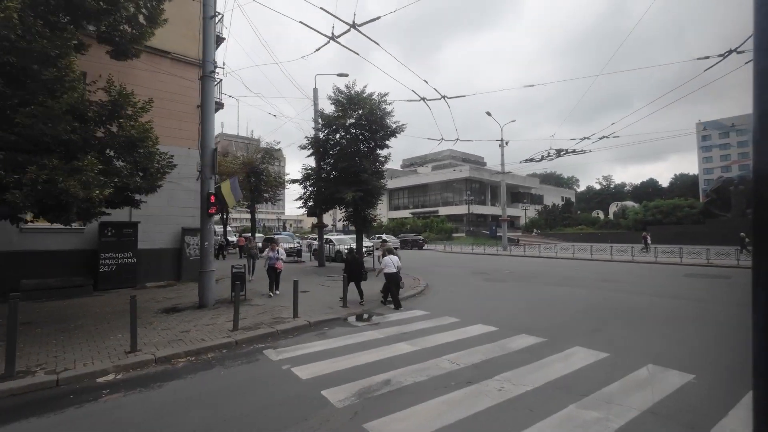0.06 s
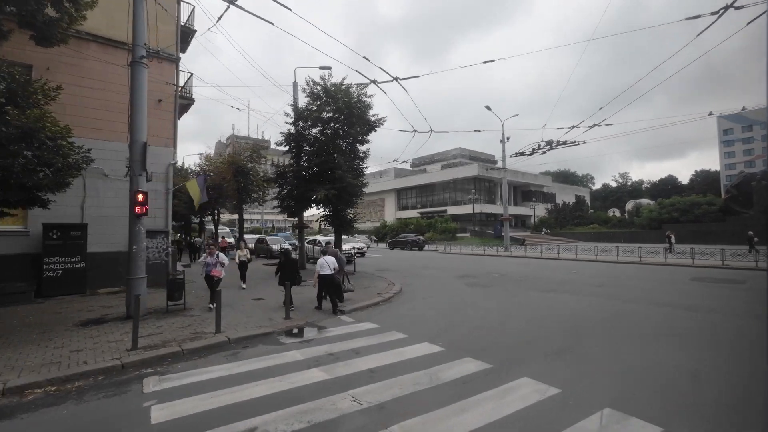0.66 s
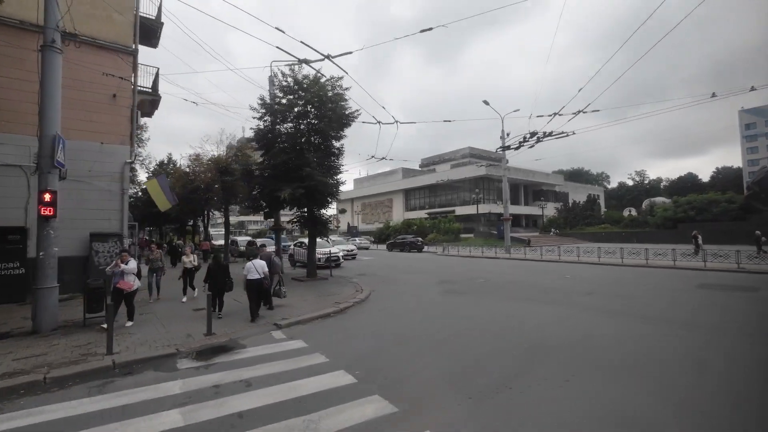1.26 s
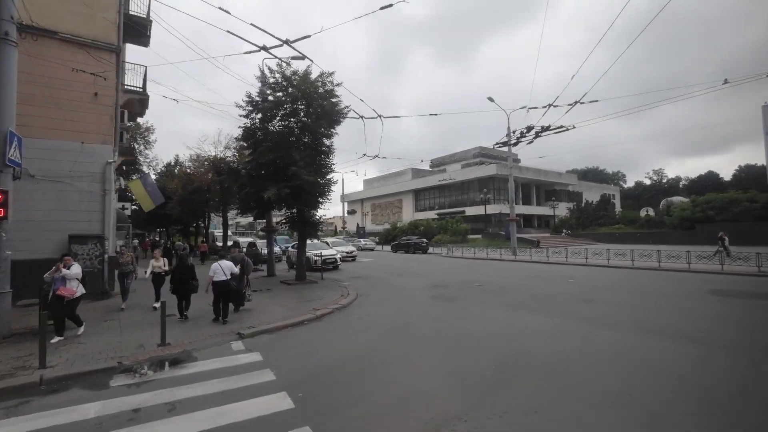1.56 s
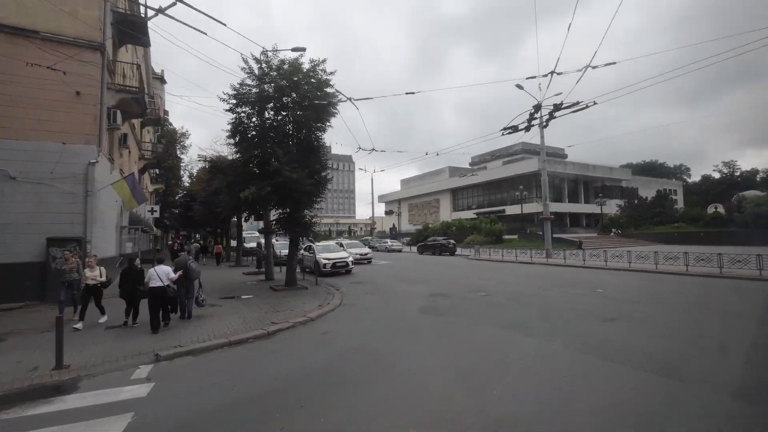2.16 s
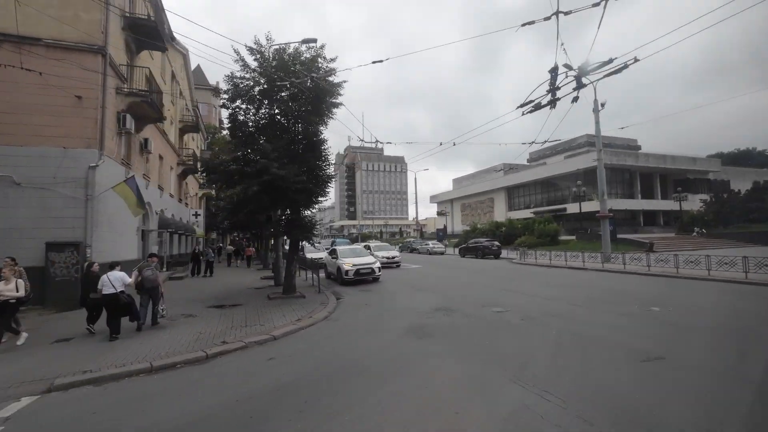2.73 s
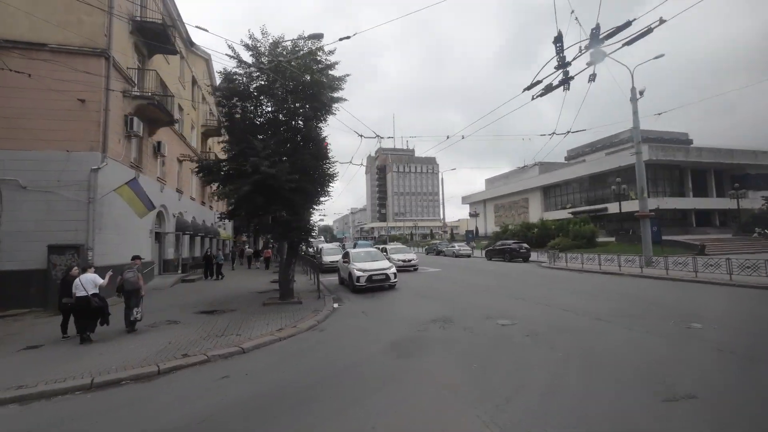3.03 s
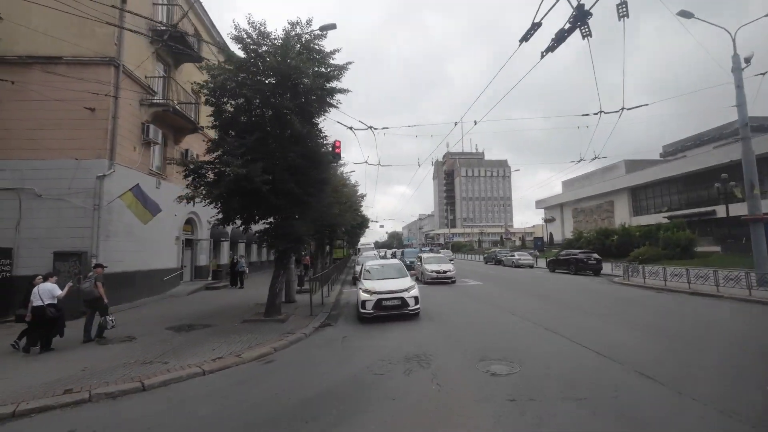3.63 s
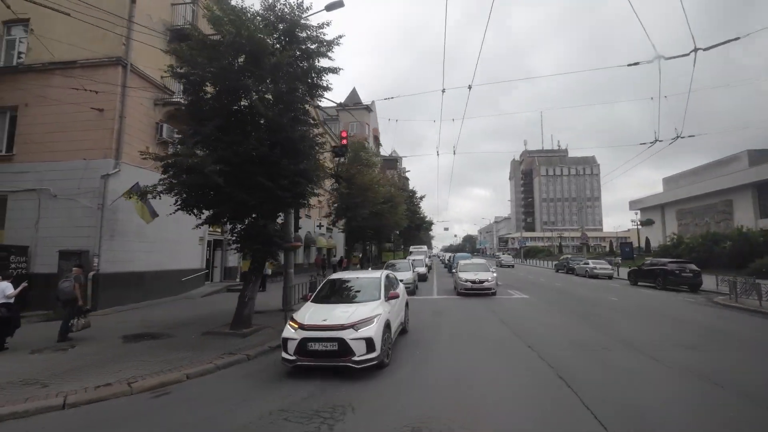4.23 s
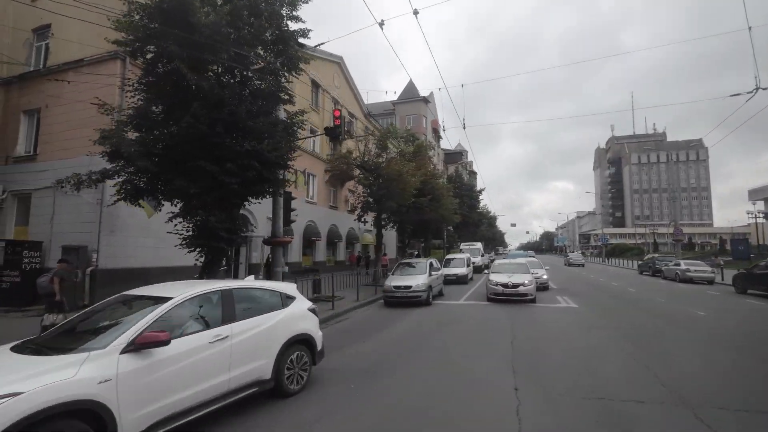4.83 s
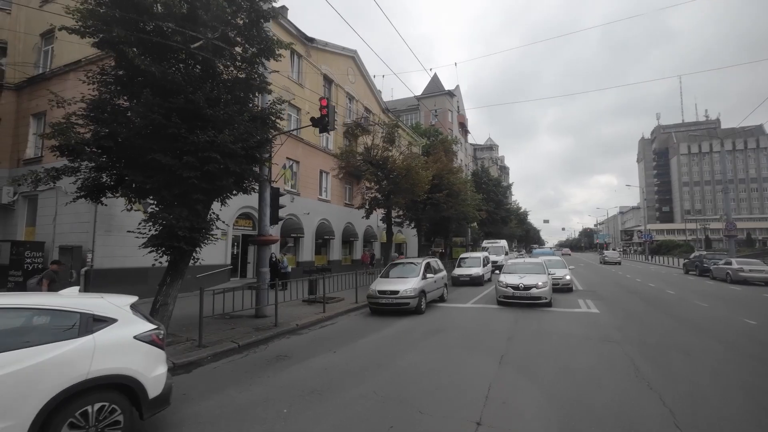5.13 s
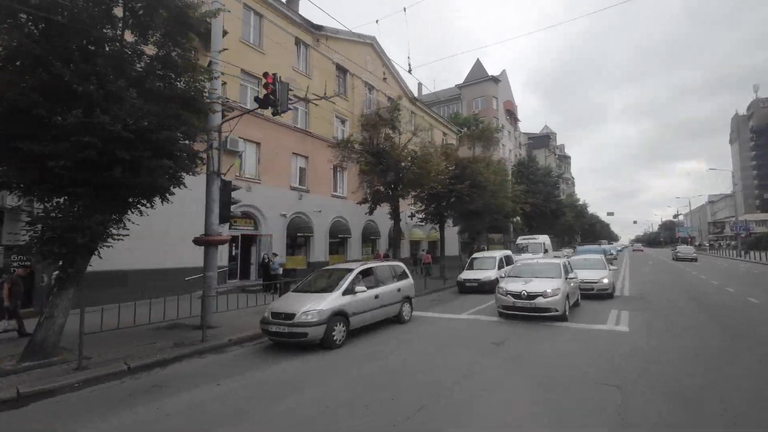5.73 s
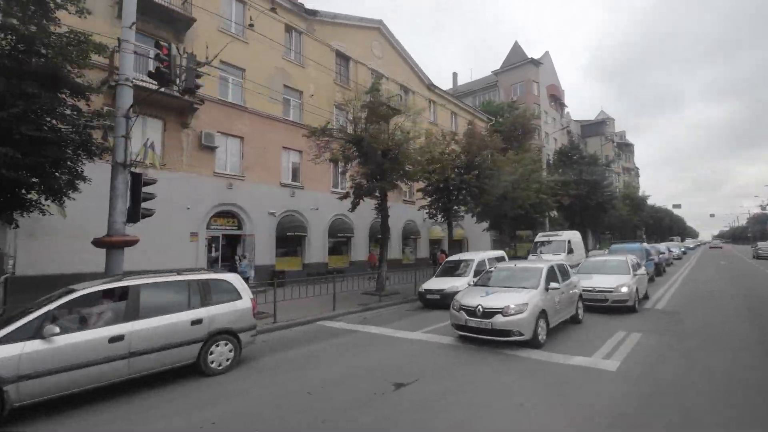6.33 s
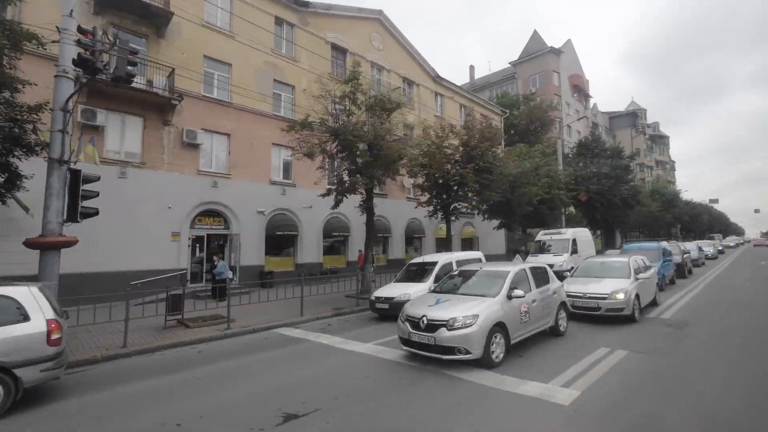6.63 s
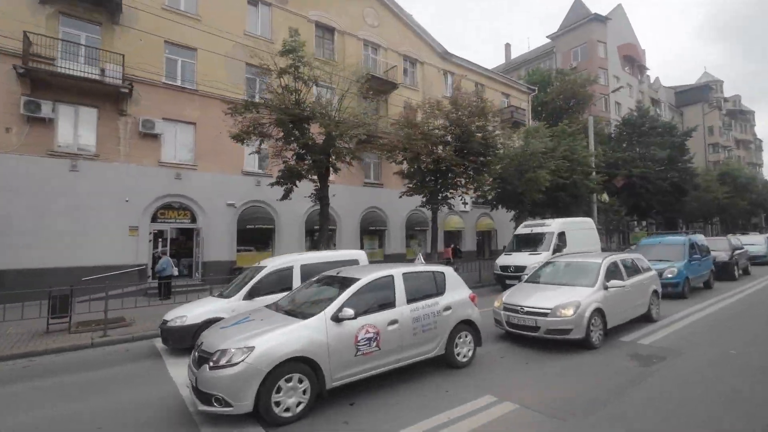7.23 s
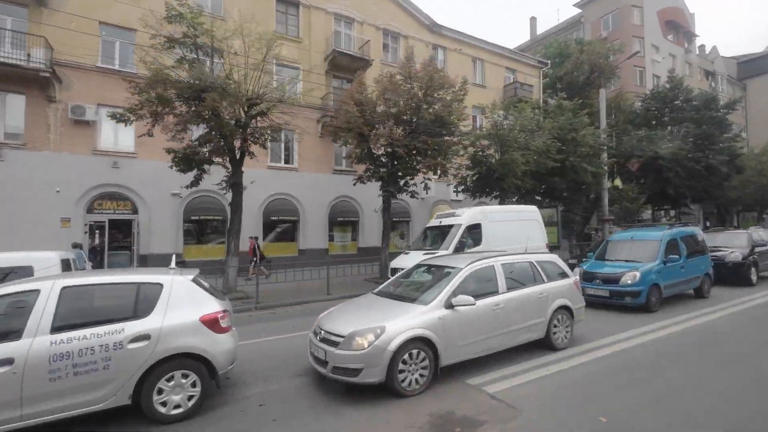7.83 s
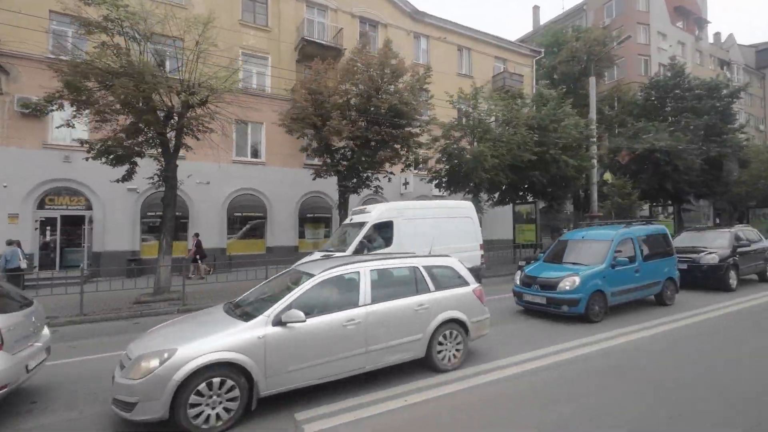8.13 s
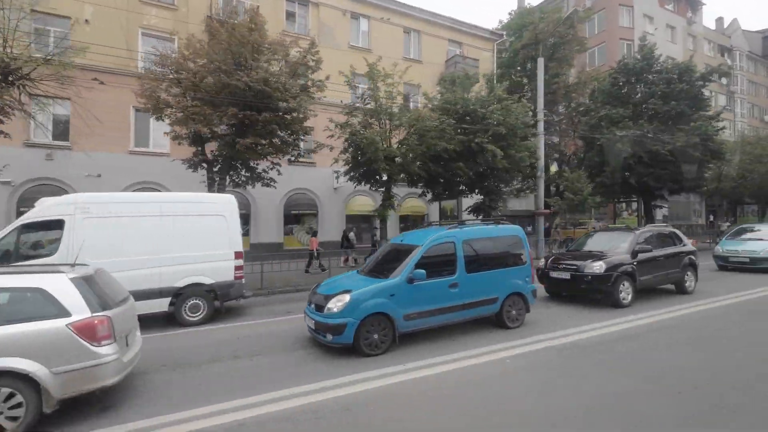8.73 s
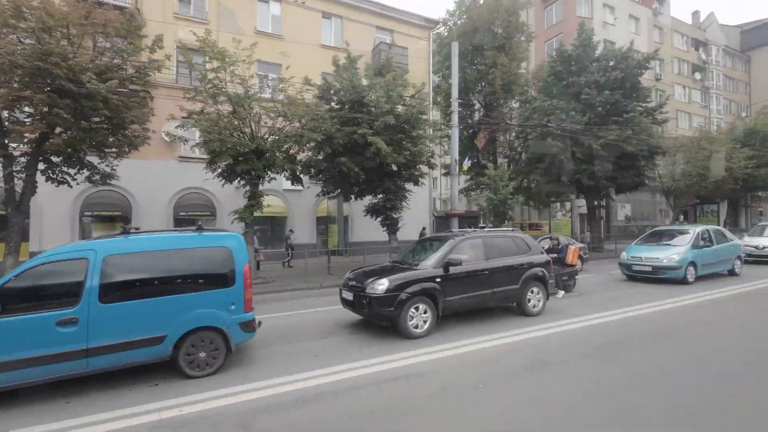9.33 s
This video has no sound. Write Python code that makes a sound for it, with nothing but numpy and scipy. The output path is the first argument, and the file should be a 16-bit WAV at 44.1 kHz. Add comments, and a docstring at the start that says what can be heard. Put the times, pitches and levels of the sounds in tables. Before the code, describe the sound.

Heard from a front seat inside a diesel city bus, the engine booms and clatters with a regular knock as the bus pulls away with a brief groan. Its pitch climbs, falls during a gear change midway, then climbs again more slowly. A thin gear whine and a faint turbo rush run under the load. The body rumbles over road bumps, compressed air puffs softly and spits once, and loose fittings click now and then.

```python
"""Inside a diesel city bus turning through a junction: it pulls away, changes gear and pulls again.
The six-cylinder engine booms in the cabin's air modes and clatters through the panels, knocking once
a cycle; the turbo rushes under load. Meshing gears whine, the body rumbles over the road,
compressed air puffs from valves at the gear changes and loose fittings click."""
import sys
import numpy as np
from scipy.fft import rfft, irfft, next_fast_len
from scipy.io import wavfile
from scipy.ndimage import uniform_filter1d, map_coordinates

SR = 44100
rng = np.random.default_rng(int(sys.argv[2]) if len(sys.argv) > 2 else 0)


def to_wav(s):
    """Save 16-bit WAV."""
    ch = np.atleast_2d(s).T  # columns
    pcm = np.round(np.clip(ch, -1, 1) * 32767)  # PCM
    wavfile.write(sys.argv[1], SR, pcm.astype(np.int16))


N = 413216

PEDAL_S, RELEASE_S, SPOOL_S = 0.08, 0.085, 0.5  # time constants: load rise, load fall, turbo spin-up
CRUISE_CYCLE_HZ, CRUISE_MESH_HZ = 10, 240
# pedal presses: down/s, up/s, depth/0-1, turbo rush/dB
PULLS = [(-1.5, 0.82, 0.35, -85), (.76, 4.075, 0.99, -60.5), (4.8, 9.4, .99, -66)]
# panel modes, in phase at both ears: f/Hz, width/Hz, lift/dB
PANEL_MODES = [(388, 37, 3.5), (728.4, 70, 8.5), (1095, 100, -3), (1410, 67, 5.5), (1542, 97, 5),
               (1614, 42, 10.5), (1746, 80, 7), (2040, 53, 2), (2614, 27, 6.5), (3080, 73, 4),
               (3283, 27, 8), (3430, 31, 5)]
# cabin air modes: f/Hz, width/Hz, lift/dB
AIR_MODES = [(48.7, 5.2, 3), (57.3, 3, -5.5), (65.13, 7.3, 9.5), (69.5, 2.3, -6), (78.5, 5.5, 8),
             (87.3, 7.4, -8), (111.6, 5.8, 8), (121.2, 14, -3), (137, 5.7, 7.5), (154, 4, 5),
             (169.8, 12.2, 8.5), (197, 66, -7), (224.7, 16, 4.5), (261.7, 15, 12), (327, 19, 1)]
# mid-range roar; every law lists: cruise level/dB, gain per speed doubling/dB, off-pedal loss/dB
ROAR_LAW = (-31.5, 6.4, 5.5)


def exhaust(cycle, pace, load, boost):
    """Six firings a cycle boom in the air modes; weaker, rough orders swell in the panels."""
    # low orders: multiple of cycle rate, cruise level/dB, per doubling/dB, off-pedal loss/dB
    orders = [(6, -27, 0, 14), (9, -41, 4, 2), (12, -30, -8, 1), (14, -35.5, 0, 18), (15, -42.5, 6, 12.5),
              (18, -34, -17, 14)]
    low = sum(tone(k * cycle, level(law, pace, boost), flutter_db=0.96, drift_rad=0.011 * k)
              for k, *law in orders)
    rough_db = level(ROAR_LAW, pace, load) - 7
    # uneven firing times blur the higher orders most
    rough = sum(tone(k * (cycle + 0.0037 * wobble(50)), rough_db - 0.34 * k, flutter_db=5, drift_rad=0.41)
                for k in range(21, 37, 3))
    firing = fuel(PEDAL_S)
    return resonate(low * firing, AIR_MODES) + resonate(rough * firing, PANEL_MODES)


def clatter(cycle, pace, load):
    """Each firing rattles and growls; once a cycle a hard knock rings the cover, then a tick follows."""
    # spectra: f/Hz, level/dB
    rattle_spectrum = [(450, -42), (800, -14.5), (1100, -1), (1350, 2.5), (1700, -6.5), (2100, -2),
                       (2750, -10.5), (3400, -15.5), (4400, -18), (5200, -28.5), (6200, -37), (7500, -50),
                       (11000, -41), (15000, -69)]
    growl_spectrum = [(380, -11), (460, 4), (540, -0.5), (620, -5.5), (740, 1.5), (900, -0.5), (1050, -5.5),
                      (1300, -23), (3000, -73)]
    knock_spectrum = [(700, -47), (1200, -13), (1400, 2), (1650, -7), (1900, -9.5), (2600, -32),
                      (5000, -60), (9000, -94.5)]
    tick_spectrum = [(1500, 0.5), (2600, -8), (3050, 3), (3400, 1), (3800, -12), (4600, -30), (5150, -12),
                     (5800, -17.5), (8000, -31), (12000, -82)]
    # laws, knock relative to clatter: cruise/dB, per doubling/dB, off-pedal loss/dB
    clatter_law = (-36.5, 5.4, 6.1)
    knock_law = (2.3, -3, 4)
    tick_law = (-41.3, 7.5, 6.5)
    # hardest knock and growl: t/s, gain/dB
    knock_gains = [(.4, -2), (.85, 1), (2.4, 0), (2.9, -2), (4.0, -1.5), (4.95, 3), (5.2, 2), (5.6, -5),
                   (6.3, -6), (6.55, 0), (7.3, 1.5), (8.3, -.5), (9.37, -1.5)]
    growl_gains = [(0, -61), (.8, -48.5), (1.4, -40.5), (2.3, -41.5), (3.9, -38.5), (4.2, -53), (5.0, -50),
                   (7.0, -51.5), (7.3, -46), (8.5, -41), (9.37, -38.5)]
    cover_hz = 1430
    firing = 6 * cycle
    rattle_drive = (1 + .5 * stroke(firing, place=.92, width=.28)) * amp(wobble(60))
    rattle = amp(-3.5) * cabin(rattle_spectrum, rattle_drive)
    growl_drive = (1 + .37 * stroke(firing, place=.18, width=.24)) * amp(2.5 * wobble(9.1))
    growl = fuel(PEDAL_S) * amp(curve(growl_gains)) * cabin(growl_spectrum, growl_drive)
    hard = amp(curve(knock_gains)) * stroke(cycle, place=.935, width=.056)
    weak = .4 * stroke(cycle, .34, .06) + .25 * stroke(cycle, .15, .05) + .22 * stroke(cycle, .65, .05)
    ring = tone(cover_hz * seconds() + .17 * wobble(260), level_db=-3, flutter_db=1, drift_rad=1)
    knock = amp(level(knock_law, pace, load)) * (hard + weak) * even(ring + cabin(knock_spectrum))
    tick_pulses = stroke(cycle, place=.985, width=.055) + .25 * stroke(cycle, place=.25, width=.08)
    tick = amp(level(tick_law, pace, load)) * tick_pulses * even(cabin(tick_spectrum))
    return amp(level(clatter_law, pace, load)) * (rattle + knock) + tick + growl


def body(pace, road_pace, load, boost):
    """Bumps rock the body; rumble and roar grow with engine speed, hiss and swish with road speed."""
    # road bumps: t/s, level/dB
    bumps = [(.01, -23), (3.079, -19), (3.25, -20), (3.67, -27), (3.88, -20), (4.16, -19), (4.6, -18),
             (5.13, -16), (5.412, -14.5), (5.75, -16.5), (6.0, -19), (6.2, -17), (6.8, -16), (6.98, -15.5),
             (7.92, -21), (8.85, -18)]
    # spectra: f/Hz, level/dB
    shake_spectrum = [(8, -44), (18, 24), (26, 2.5), (34, 12.5), (45, -16), (60, -15), (90, -64),
                      (200, -87)]
    rumble_spectrum = [(35, -26), (55, 1.5), (75, 8.5), (92, 0.5), (110, 4), (128, -3.5), (165, 1.5),
                       (205, -6.5), (270, -14.5), (400, -41), (900, -84)]
    roar_spectrum = [(120, -58), (210, -4), (270, 0), (390, -0.5), (450, -7), (530, -7.5), (620, -10.5),
                     (760, -14.5), (880, -18), (1100, -21), (1600, -23), (4000, -60)]
    hiss_spectrum = [(2500, -37), (5000, 5), (8000, 1), (10500, -0.5), (13000, -0.5), (15000, -17.5)]
    swish_spectrum = [(900, -36), (1800, 10.5), (2600, -9.5), (3500, 3), (4400, -10), (5400, -4.5),
                      (8000, -16), (15000, -44)]
    # laws: cruise/dB, per doubling/dB, off-pedal loss/dB
    shake_law = (-23, 6.7, 0.26)
    rumble_law = (-24.5, 5.6, 1.6)
    hiss_law = (-66, 3.6, 7.5)
    swish_law = (-51, 9.6, 7.6)
    bending_hz, bump_rise_s = 30.1, 0.049
    bump_power = np.zeros(N)
    for start_s, db in bumps:
        age = since(start_s) / bump_rise_s
        bump_power += (amp(db) * age * np.exp(1 - age)) ** 2
    rocking = np.sqrt(amp(level(shake_law, road_pace, load)) ** 2 + bump_power)
    bending = tone(bending_hz * seconds(), level_db=-2, flutter_db=1.5, drift_rad=1.5)
    shake = rocking * (bending + cabin(shake_spectrum))
    rumble = amp(level(rumble_law, pace, load)) * cabin(rumble_spectrum)
    roar = amp(level(ROAR_LAW, pace, load) + 0.52 * wobble(13)) * cabin(roar_spectrum)
    hiss = amp(level(hiss_law, road_pace, boost) + 0.93 * wobble(27)) * cabin(hiss_spectrum)
    swish = amp(level(swish_law, road_pace, boost)) * cabin(swish_spectrum)
    return shake + rumble + roar + hiss + swish


def transmission(mesh_hz, boost):
    """Gear teeth whine under torque, swelling in the air modes and blurring into a drone at speed."""
    # laws: cruise/dB, per doubling/dB, off-pedal loss/dB
    whine_law = (-37.5, -1.2, 8.3)
    drone_law = (-45.5, 20, 7.5)
    # drone: f/Hz, level/dB
    spectrum = [(200, -31), (262, 8), (280, 0.5), (305, 12), (328, 7.5), (350, -11), (450, -44)]
    road_pace = mesh_hz / CRUISE_MESH_HZ
    whine_db = level(whine_law, road_pace, boost)
    whine = tone(np.cumsum(mesh_hz) / SR, whine_db, flutter_db=0.5, drift_rad=.4 * road_pace ** 6)
    drone = amp(level(drone_law, road_pace, boost)) * cabin(spectrum)
    return resonate(whine * fuel(rise_s=0.15), AIR_MODES) + drone


def pull_away():
    """The drive line groans and shudders as the bus gathers its first speed."""
    # groan: f/Hz, level/dB
    spectrum = [(260, -14), (330, 14.5), (400, -6.5), (490, -2), (640, -32), (790, -23), (870, 0.5),
                (1000, -34), (2000, -67)]
    groan = amp(-40.5) * cabin(spectrum, amp(1.2 * wobble(15)))
    shudder_hz = np.interp(seconds(), [0, .6, 1.4], [74.8, 72.8, 80.16])
    shudder = tone(np.cumsum(shudder_hz) / SR, level_db=-31, flutter_db=2, drift_rad=0.25)
    return press(down_s=-0.15, up_s=1.48, rise_s=PEDAL_S) * (groan + shudder)


def booms():
    """Now and then an air mode of the cabin swells briefly."""
    # swells: t/s, f/Hz, gain/dB, half length/s
    swells = [(1.46, 79, -19.5, 0.088), (2.2, 452, -41, .45), (2.512, 398.6, -32.5, 0.14),
              (3.17, 255, -29, 0.13), (3.2, 146, -21.5, 0.076), (3.7, 543, -40, .35),
              (3.972, 262.7, -29.5, 0.14), (4.702, 111.8, -26.5, 0.19), (5.03, 111, -28.5, 0.097)]
    t = seconds()
    return sum(amp(db) * np.exp(-((t - peak_s) / half_s) ** 2)
               * tone(hz * t, level_db=-2, flutter_db=2, drift_rad=0.23)
               for peak_s, hz, db, half_s in swells)


def overrun(pace):
    """With the fuel cut, unloaded gears rattle in their casing, fading as the engine slows."""
    # rattle: f/Hz, level/dB
    spectrum = [(450, 6), (700, -5), (900, -24), (1250, -3.5), (1800, -22), (3700, -16), (6000, -39)]
    # casing modes: f/Hz, width/Hz, lift/dB
    casing_modes = [(524, 60, 6.8), (670, 56, 15), (1240, 60, 7.6), (2480, 120, 3.2), (3630, 140, 5.1)]
    rattle = unit(resonate(cabin(spectrum), casing_modes))
    return amp(-42.5) * pace ** 2 * (1 - fuel(PEDAL_S)) * rattle


def air_valves():
    """Compressed air escapes in soft puffs and one sharp double spit."""
    # releases: t/s, level/dB, t60/s
    puffs = [(.57, -48.5, 0.25), (.65, -61.5, 0.66), (.835, -61, 0.4), (4.095, -51, 0.15),
             (4.25, -62, 0.25)]
    spits = [(5.705, -29.5, 0.049), (5.717, -37.5, 0.097)]
    # spectra: f/Hz, level/dB
    puff_spectrum = [(1500, -37), (4000, -4), (8000, -14), (12000, -7), (13500, -11), (14600, -7),
                     (15600, -9)]
    spit_spectrum = [(1500, 1), (3000, 8.5), (4300, 6), (6500, -3), (8500, -6.5), (11000, -7), (15000, -16)]
    return bursts(puffs, puff_spectrum, attack_s=0.0073) + bursts(spits, spit_spectrum, attack_s=0.0016)


def fittings():
    """Loose fittings click and jingle."""
    # impacts: t/s, level/dB, t60/s
    clicks = [(.325, -41.5, 0.079), (.845, -56, 0.086), (4.864, -27, 0.024), (5.355, -35, 0.042),
              (6.003, -30, 0.076)]
    taps = [(.33, -53, 0.11), (.84, -48.5, 0.15), (.888, -51.5, .2), (.938, -57, 0.18), (.975, -71, 0.11)]
    # spectra: f/Hz, level/dB
    click_spectrum = [(500, -8), (1200, 7), (3800, 1.5), (6000, -9), (9000, -16), (15000, -24)]
    tap_spectrum = [(2500, -31), (3900, 6), (4600, 7), (5600, -4), (9000, -9.5), (15000, -22)]
    return bursts(clicks, click_spectrum, attack_s=0.00064) + bursts(taps, tap_spectrum, attack_s=0.004)


def turbo(cycle):
    """Under load the intake rushes in narrow, whistling bands, pulsing once per crank turn."""
    # intake modes: f/Hz, width/Hz, lift/dB
    intake_modes = [(5010, 480, 17.5), (6070, 480, 14), (10130, 650, 13), (11300, 1100, 10.5)]
    spectrum = [(3500, -46), (4800, 2.5), (11500, -5.5), (15000, -12)]  # f/Hz, level/dB
    spool = sum(amp(db) * press(down_s, up_s, SPOOL_S) for down_s, up_s, _, db in PULLS)
    gulps = (1 + stroke(2 * cycle, place=.71, width=.12)) * amp(1.9 * wobble(15))
    noise = rng.standard_normal((2, N))
    rush = filtered(noise, lambda hz: lift(intake_modes, hz) * amp(along(spectrum, hz)))
    return spool * unit(gulps * rush)


def bleeds():
    """Air hisses through a narrow valve with a faint, very high whistle until it shuts."""
    # openings: from/s, to/s, level/dB, whistle f/Hz, width/Hz
    openings = [(.66, .81, -66, 11900, 300), (4.965, 5.0, -59, 14500, 900), (5.0, 5.2, -64, 14400, 900),
                (5.79, 5.88, -61, 14300, 1200)]
    # hiss: f/Hz, level/dB
    spectrum = [(6000, -25), (10500, -9), (12000, 0), (15000, -5), (15600, -6)]
    whistle_lift_db = 7
    hiss = cabin(spectrum)
    return sum(amp(db) * press(open_s, shut_s, rise_s=.003, fall_s=.02)
               * unit(resonate(hiss, [(hz, width_hz, whistle_lift_db)]))
               for open_s, shut_s, db, hz, width_hz in openings)


def cabin(spectrum, drive=1):
    """Stereo noise, modulated by drive and coloured by the panels; mid rms 1."""
    # panel modes, opposed at the two ears: f/Hz, width/Hz, lift/dB
    side_modes = [(730, 210, 7.5), (893, 49, 10.5), (1410, 70, -3), (1500, 78, -8), (1660, 45, 12.5),
                  (1980, 90, 3), (2400, 250, 2), (3440, 180, 6)]
    # sound reaching the right ear first: f/Hz, signed share
    right_first = [(100, .4), (280, 0.96), (380, 0.98), (500, 0.9), (720, 0.96), (950, -0.11), (1100, -0.5),
                   (1280, 0.2), (1420, 1), (1580, .6), (1700, 0.35), (3300, -0.0093), (4200, 0)]
    # stereo width: f/Hz, side gain/dB
    side_gains = [(40, -21.5), (100, -23.5), (200, -13), (380, -8), (550, -4.5), (800, -2.5), (1100, 1),
                  (1400, -2), (2000, -1), (4000, 0.5), (15000, 0.5)]
    size = next_fast_len(N + SR // 2)
    hz = np.fft.rfftfreq(size, 1 / SR)
    low_cut = 1 / (1 + (spectrum[0][0] / (2 * hz + 1)) ** 2)
    noise = drive * rng.standard_normal((2, N))
    direct, diffuse = rfft(noise, size) * amp(along(spectrum, hz)) * low_cut
    early = np.clip(along(right_first, hz), -1, 1)
    across = (np.sqrt(1 - early ** 2) * diffuse - 1j * early * direct) * amp(along(side_gains, hz))
    mid = irfft(direct * lift(PANEL_MODES, hz), size)[:N]
    side = irfft(across * lift(side_modes, hz), size)[:N]
    return np.array([mid + side, mid - side]) / np.std(mid)


def bursts(events, spectrum, attack_s):
    """Noise bursts that rise fast and decay exponentially."""
    envelope = np.zeros(N)
    for start_s, db, t60_s in events:
        age_s = since(start_s)
        envelope += amp(db - 60 * age_s / t60_s) * (1 - np.exp(-age_s / attack_s))
    return envelope * cabin(spectrum)


def tone(turns, level_db, flutter_db, drift_rad):
    """Sine with unsteady level and phase."""
    phase = 2 * np.pi * (turns + rng.random()) + drift_rad * wobble(12)
    return np.sqrt(2) * amp(level_db + flutter_db * wobble(14)) * np.sin(phase)


def stroke(turns, place, width):
    """One smooth pulse per turn; place and width in turns."""
    return np.exp((np.cos(2 * np.pi * (turns - place)) - 1) / (2 * np.pi * width) ** 2)


def level(law, pace, load):
    """Level/dB from speed (pace 1 = cruise) and load (1 = full)."""
    cruise_db, doubling_db, coast_db = law
    return cruise_db + doubling_db * np.log2(pace) - coast_db * (1 - load)


def press(down_s, up_s, rise_s, fall_s=RELEASE_S):
    """Rises towards 1 while a pedal or valve is down, then decays."""
    return (1 - np.exp(-since(down_s) / rise_s)) * np.exp(-since(up_s) / fall_s)


def pedal(rise_s):
    """Lagged pedal depth."""
    return sum(depth * press(down_s, up_s, rise_s) for down_s, up_s, depth, _ in PULLS)


def fuel(rise_s):
    """1 while the engine fires, 0 while it coasts."""
    return np.minimum(sum(press(down_s, up_s, rise_s) for down_s, up_s, *_ in PULLS), 1)


def even(x, span_s=.008):
    """Holds power steady over span_s, so blows carry like energy."""
    power = uniform_filter1d(np.mean(x ** 2, axis=0), int(span_s * SR))
    return x / np.sqrt(np.abs(power) + 1e-12)


def lift(modes, hz):
    """Gain of a set of resonances."""
    return amp(sum(db / (1 + (2 * (hz - mode_hz) / width_hz) ** 2) for mode_hz, width_hz, db in modes))


def resonate(x, modes):
    """x through a set of resonances."""
    return filtered(x, lambda hz: lift(modes, hz))


def filtered(x, response):
    """x through a zero-phase gain response(hz)."""
    size = next_fast_len(N + SR // 2)
    return irfft(rfft(x, size) * response(np.fft.rfftfreq(size, 1 / SR)), size)[..., :N]


def wobble(rate_hz):
    """Smooth random curve with knots at rate_hz."""
    return map_coordinates(rng.standard_normal(int(N * rate_hz / SR) + 4), [seconds() * rate_hz])


def along(points, hz):
    """(f/Hz, value) points read on a log axis."""
    knots_hz, values = np.transpose(points)
    return np.interp(np.log(hz + 1), np.log(knots_hz), values)


def curve(points):
    """(t/s, value) points read at every sample."""
    return np.interp(seconds(), *np.transpose(points))


def seconds():
    """Time axis."""
    return np.arange(N) / SR


def since(start_s):
    """Seconds after start_s, 0 before."""
    return np.maximum(seconds() - start_s, 0)


def amp(db):
    """Decibels to gain."""
    return 10 ** (np.asarray(db) / 20)


def unit(x):
    """Scaled to rms 1."""
    return x / np.sqrt(np.mean(x ** 2) + 1e-20)


def scene():
    """Engine, drive line, body and air system, heard from a front seat."""
    # engine speed: t/s, four-stroke cycle rate/Hz
    speeds = [(0, 10.28), (.25, 8.82), (.5, 8.23), (.85, 8.76), (1.1, 7.98), (1.4, 8.93), (1.7, 9.44),
              (3.95, 13.83), (4.7, 10.23), (5.1, 10.32), (5.45, 8.59), (5.7, 8.5), (6.4, 9.57),
              (7.6, 10.89), (9.37, 12.69)]
    # gear change: t/s, teeth meshing per engine cycle
    gearing = [(3.95, 19.1), (5.1, 20.6), (5.45, 24.7)]
    # balance: f/Hz, left over right/dB
    balance = [(60, -0.5), (92, 1.5), (140, -1.5), (210, 1.5), (330, -0.5), (500, 2.5), (770, 2.5),
               (1170, 4), (1380, -7), (1520, -1), (1790, -2.5), (2500, 1.5), (4190, -0.5), (6410, -2.5),
               (9810, 0.5), (15000, -1)]
    cycle_hz = curve(speeds)
    cycle = np.cumsum(cycle_hz) / SR - .23
    mesh_hz = cycle_hz * curve(gearing)
    pace, road_pace = cycle_hz / CRUISE_CYCLE_HZ, mesh_hz / CRUISE_MESH_HZ
    load, boost = pedal(PEDAL_S), pedal(SPOOL_S)
    engine = exhaust(cycle, pace, load, boost) + clatter(cycle, pace, load) + turbo(cycle)
    drive_line = transmission(mesh_hz, boost) + overrun(pace) + pull_away()
    details = air_valves() + bleeds() + fittings()
    inside = engine + drive_line + details + body(pace, road_pace, load, boost) + booms()
    return filtered(inside, lambda hz: amp(np.outer([.5, -.5], along(balance, hz))))


def record(dry):
    """Brick-wall low-pass."""
    cutoff_hz = 15650
    return filtered(dry, lambda hz: hz < cutoff_hz)


dry = scene()
out = record(dry)
to_wav(out)
```